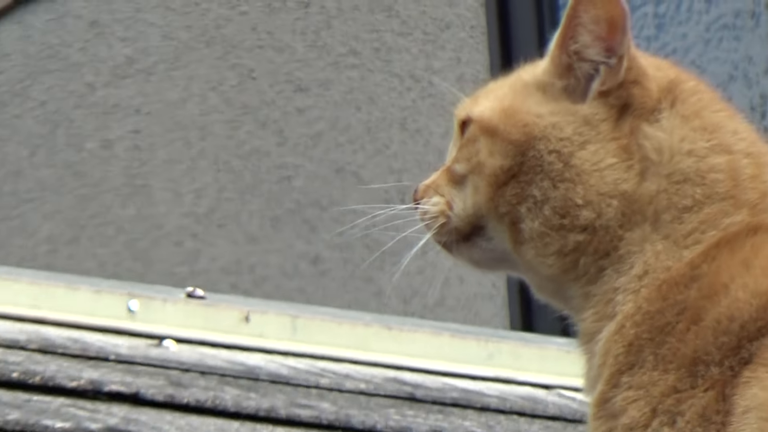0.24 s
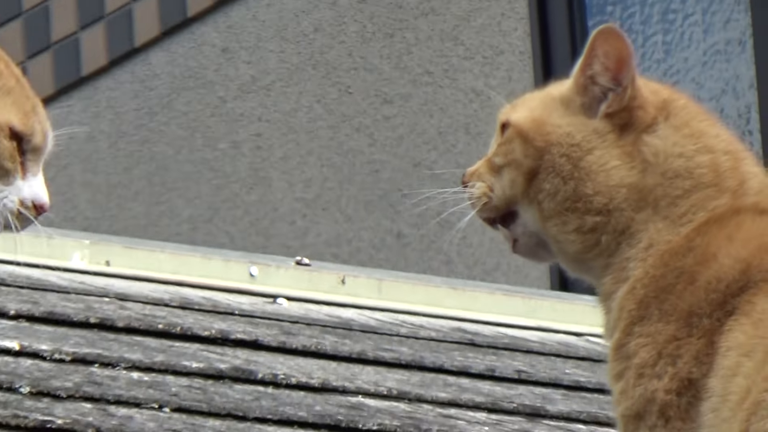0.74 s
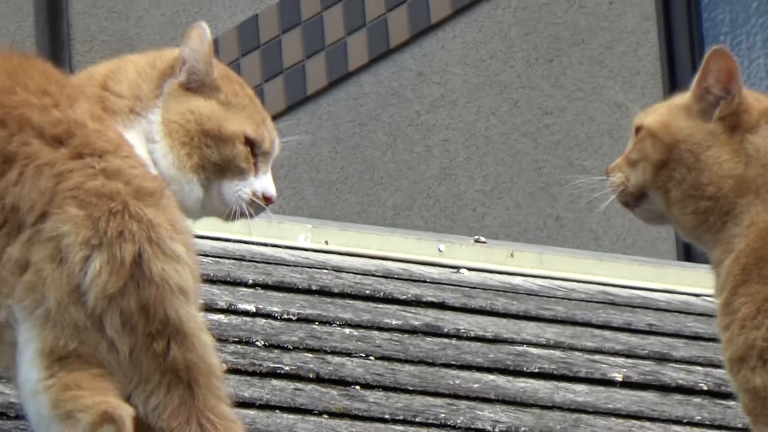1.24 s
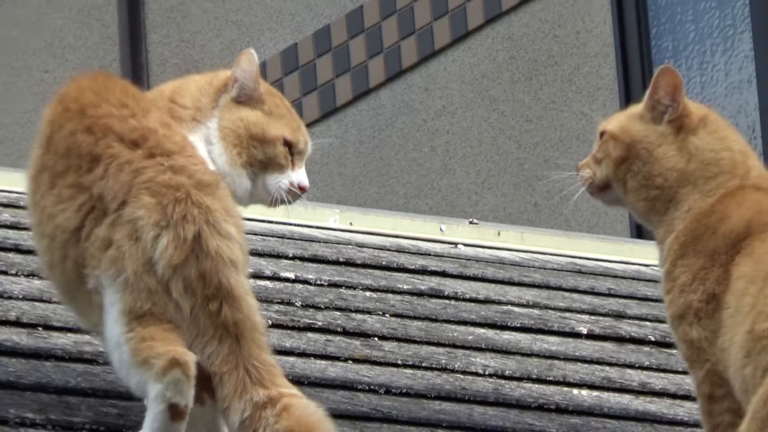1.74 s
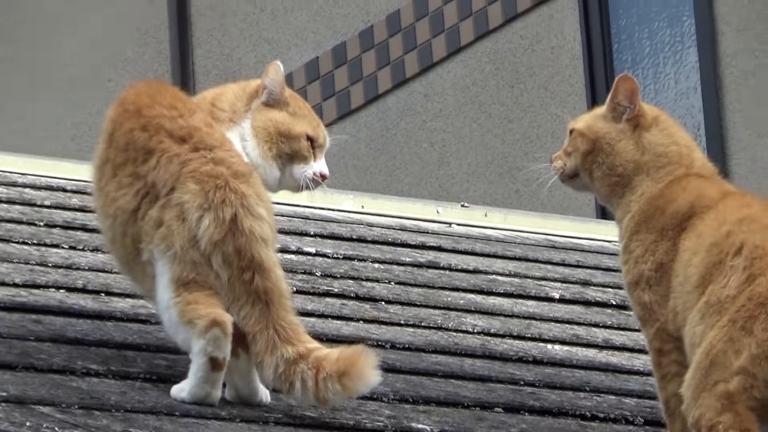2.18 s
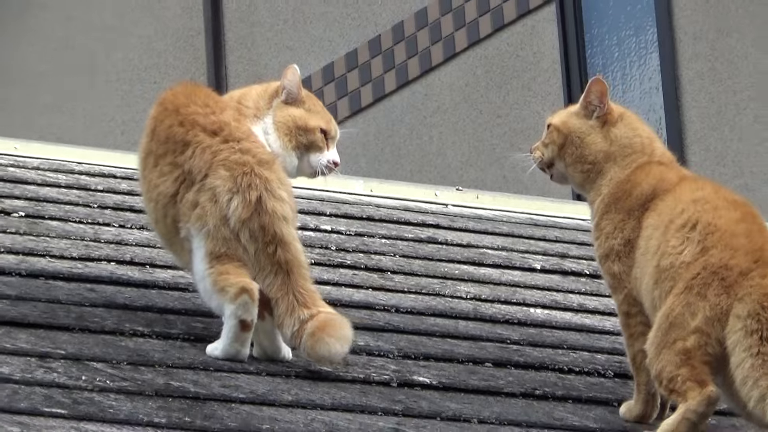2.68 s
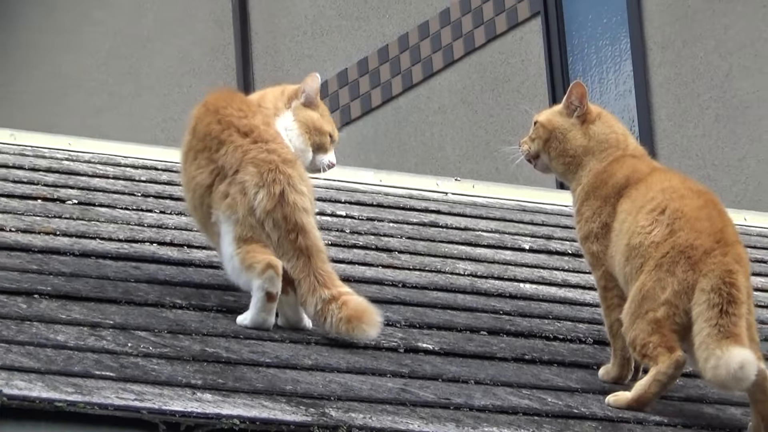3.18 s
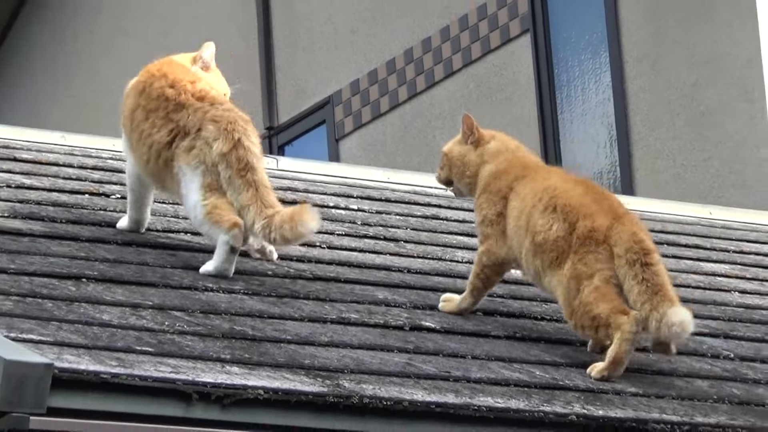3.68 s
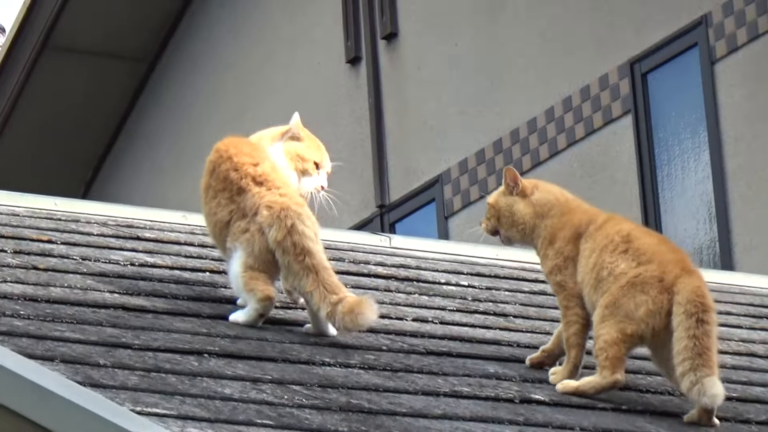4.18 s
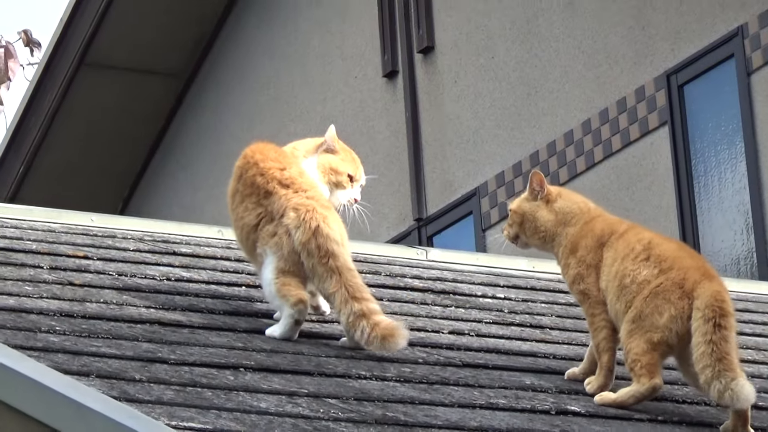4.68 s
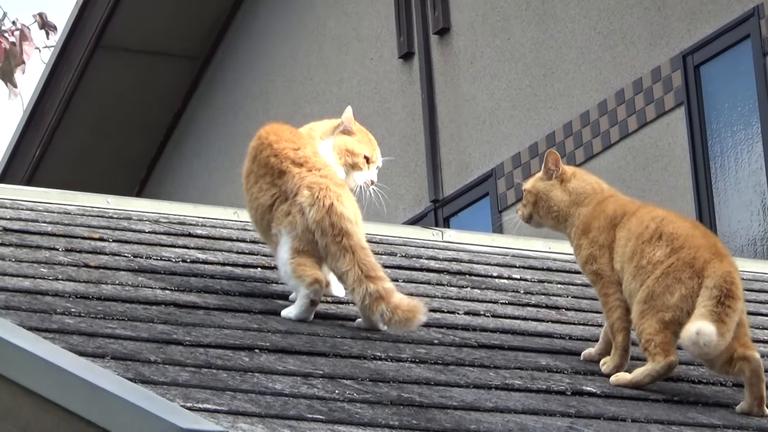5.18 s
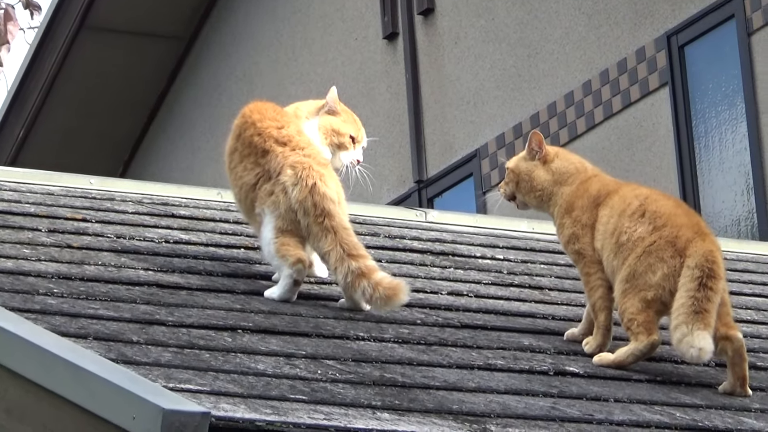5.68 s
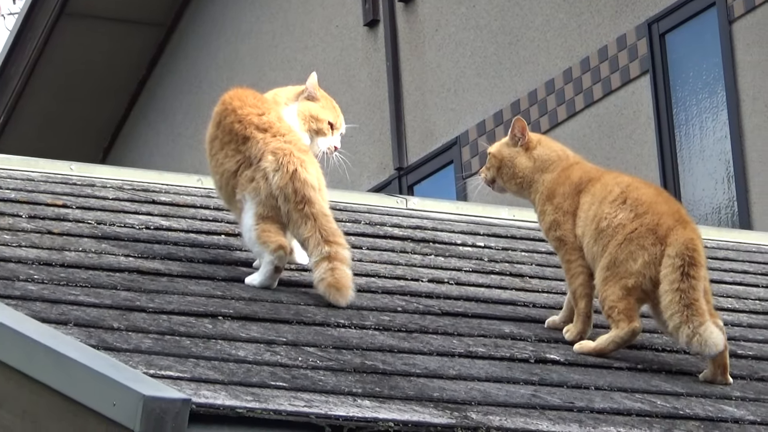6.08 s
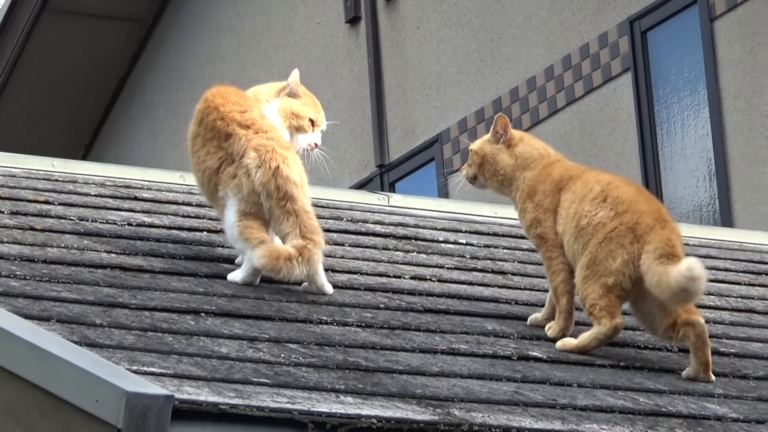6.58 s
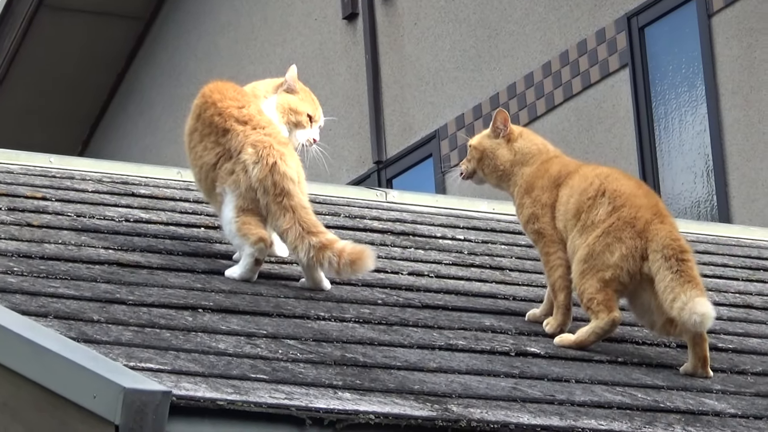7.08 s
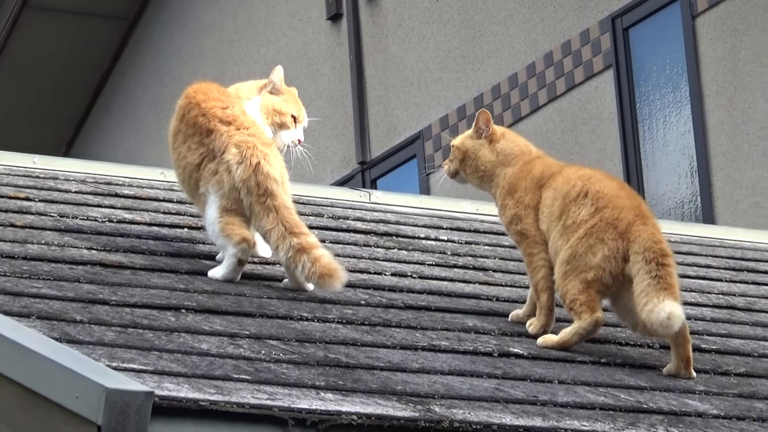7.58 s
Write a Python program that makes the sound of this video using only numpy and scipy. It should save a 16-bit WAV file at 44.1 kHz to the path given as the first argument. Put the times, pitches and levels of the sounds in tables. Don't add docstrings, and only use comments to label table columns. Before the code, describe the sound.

Outdoors on a tiled roof between houses, a paw knocks a loose tile, then a cat ahead yowls four times, each call rising slightly, holding and sagging, later ones louder. Walls return short echoes. A dog barks far to the right between and under the calls. Low town rumble and air hiss continue throughout, with a faint lens motor whine early on. Close stereo microphones.

```python
import sys
import numpy as np
from scipy import signal
from scipy.io import wavfile
from scipy.ndimage import uniform_filter1d

SR = 44100
rng = np.random.default_rng(int(sys.argv[2]) if len(sys.argv) > 2 else 0)


def ratio_of_db(decibels):
    return 10 ** (np.asarray(decibels, float) / 20)


def output_pcm(signal):
    pcm = np.clip(np.atleast_2d(signal).T, -1, 1) * 32767
    wavfile.write(sys.argv[1], SR, np.round(pcm).astype(np.int16))


N = 345744
T = np.arange(N) / SR

# [f/Hz, density/dB per Hz]
TOWN_SPECTRUM = [(25, -20), (65, -16.5), (154, -11.5), (800, -15.5), (1600, -22.5), (3620, -29.5),
                 (9050, -31.5), (12800, -40.5)]
# [f/Hz, likeness/0-1]
STEREO_LIKENESS = [(60, 0.99), (130, 1.0), (290, 0.95), (640, 0.81), (1410, 0.5), (3100, 0.42), (6820, 0.7),
                   (15000, 1)]
# [t/s, nearness/dB]
VEHICLE_NEARNESS = [(0, 1.5), (1, -0.5), (2.2, 2), (3.8, 1), (4.7, 4), (6, 3.5), (6.6, 4.5), (7.4, 6.5),
                    (7.84, 5)]
# [f/Hz, width/Hz, level/dB]
ENGINE_BANDS = [(173, 17, -2.5), (248.7, 48, -3.5), (114.4, 65, -5)]
ENGINE_DB, ENGINE_SHARE, AIR_SHARE = -63, 2.55, 0.05
# (peak t/s, level/dB, slope/dB per s)
FAR_MACHINE = (5.24, -56, 26)
ZOOM_END_S, WHINE_HZ, WHINE_DB, WHINE_FADE_DB_PER_S, STILL_AIR_DB = 3.34, 13750, -75, 1.5, 4
SETTLE_S, SETTLE_DB = 6.67, -1.5

# [start t/s, length/s, start f/Hz, end f/Hz, level/dB]
FAINT_TONES = [
    (1.45, .14, 570, 410, -53),
    (4.8, .14, 595, 560, -45),
    (2.35, .09, 1370, 1450, -57),
    (2.46, .1, 1440, 1400, -61),
    (1.99, .07, 1150, 1180, -62),
    (.075, .035, 3750, 3800, -67),
]

# [delay t/s, left level/dB, right level/dB]
WALL_ECHOES = [(.013, -13, -16), (.028, -22, -16), (.042, -15, -19), (.074, -26, -23)]
YARD_T60_S, YARD_DB, YARD_TOP_HZ = .5, -10.5, 3930

# [t/s, peak level/dB, body f/Hz, treble level/dB, scrape length/s]
LOOSE_STEPS = [
    (.123, -34.5, 4900, -4, 0.012),
    (0.132, -17.5, 1300, -18, .001),
]
FIRM_STEPS = [(0.139, -34, 1200, -3.5, 0.042), (2.253, -48, 3000, .5, .004), (2.305, -53, 3000, 4, 0.011),
              (3.287, -34.5, 1400, -30, 0.0048), (3.296, -44.5, 4420, 1, 0.019),
              (3.471, -43, 3020, -4, 0.0032), (3.533, -33, 3300, -29, 0.0044), (4.86, -44, 2400, -5, 0.03),
              (6.76, -41, 1500, -14, 0.015), (6.79, -56, 4000, 11, 0.022), (3.74, -44, 7500, -2, .04),
              (7.622, -56, 6000, 5, 0.022)]
# [f/Hz, width/Hz, level/dB]
TILE_MODES = [(1290, 38, 2.5), (1980, 110, 1), (3360, 61, -7), (4980, 41, -6.5), (6060, 82, -14),
              (7500, 34, -14), (8500, 81, -10)]
FIRM_RING_DB, LOOSE_RING_DB = -23, -2

# [t/s, pitch f/Hz, effort level/dB, mouth opening level/dB, tongue/0 back - 1 front]
YOWL_1 = [(.647, 571, -40.5, -7, 0.13), (0.674, 619, -33.5, -12, 0.069), (0.735, 656, -29, -5, 0.4),
          (0.83, 676, -27, -3.5, 0.61), (1.012, 687, -28.5, 3, 0.56), (1.185, 680.7, -30.5, -1, 0.58),
          (1.28, 630.6, -25.5, -15.5, .32), (1.329, 619, -35, -15, 0.29), (1.41, 598, -45.5, -9, 0.19)]
YOWL_2 = [(2.773, 668, -36, -17, .15), (2.794, 676.2, -33.5, -12, 0.36), (2.865, 698.5, -34, -6, .42),
          (2.903, 697.7, -32, -11.5, 0.48), (3.011, 690.7, -31, -6.5, 0.48),
          (3.179, 680.4, -27, -7.5, 0.57), (3.263, 642, -31, -8.5, 0.46), (3.3, 649.6, -57, -1, .6),
          (3.325, 633, -42, -7, 0.61)]
YOWL_3 = [(3.684, 791.7, -50.5, 16, 0.026), (3.725, 792, -32, 10.5, 0.021), (3.862, 796.8, -28.5, 5, 0.54),
          (4.012, 782.8, -25.5, 4, 0.57), (4.186, 768.4, -25.5, -2.5, 0.72),
          (4.226, 762.6, -22.5, 2.5, 0.55), (4.452, 706, -23.5, 0, 0.66), (4.63, 688.8, -20.5, -6.5, .55),
          (4.791, 677.5, -22, -9, 0.27)]
YOWL_4 = [(5.669, 586.5, -27.5, -1.5, -0.22), (5.717, 632.3, -22, -9, -0.017),
          (5.825, 656.4, -22.5, -6.5, 0.26), (5.972, 648.4, -17, -11, 0.37),
          (6.021, 638.4, -19.5, -15, 0.55), (6.042, 668, -22.5, -17, .8)]
YOWL_4_END = [(6.062, 681.7, -30.5, -12.5, 0.85), (6.229, 671.6, -25.5, -20.5, 0.68),
              (6.433, 648, -23, -21, .35), (6.517, 633.4, -25, -15.5, 0.47), (6.569, 612, -21.5, -18, 0.26),
              (6.637, 587.2, -23.5, -10.5, 0.32), (6.732, 602.4, -32, -29, .02), (6.77, 549, -51, -6, .3)]
# [f/Hz, width/Hz, level/dB]
MOUTH_RESONANCES = [
    [(4090, 540, 2.5), (5300, 640, -11), (6200, 190, -11), (8680, 400, -3.5), (9980, 220, -13),
     (12100, 500, -17)],
    [(3940, 1500, 3), (5360, 500, -9), (8030, 260, 1), (9270, 450, -1.5), (11500, 500, -18)],
    [(2880, 490, -8), (4500, 300, 4), (6000, 1300, -4), (7700, 1400, -8), (9170, 430, -8),
     (10800, 580, -10.5), (12300, 400, -16)],
    [(3580, 730, 5.5), (5000, 600, -12), (7280, 940, 2), (8600, 1000, -2), (11300, 600, -6)],
    [(4393, 163, 5.5), (5600, 760, -9), (7160, 490, -6), (8630, 320, -9), (10500, 800, -19.5)],
]
# [start level/dB, middle level/dB, end level/dB, share of the effort swell]
FUNDAMENTALS = [(-37.5, -43.5, -38, 0.99), (-37.5, -43, -42, 0.54), (-31, -29.5, -40, 0.55),
                (-44.5, -33.5, -47.5, 0.13), (-39, -37.5, -49, 0.083)]
# [level under effort/dB, loss/dB per octave under top pitch, release/s, breath level/dB]
TREBLES = [(-16.5, 63, 0.024, -36), (-20, 33, 0.009, -32), (-17, 26.5, 0.074, -33), (-25.5, 36, 0.045, -46),
           (-24, 10, 0.0096, -35.5)]
# [start depth f/Hz, start time/s, end depth f/Hz, end time/s]
PITCH_SCOOPS = [(0, .05, 0, .05), (0, .05, 0, .05), (440, .066, 92, .065), (0, .05, 0, .05),
                (0, .05, 0, .05)]
# [peak t/s, level/dB, time to lose 15 dB/s]
ROUGH_SPELLS = [(4.04, -49.5, .3), (4.8, -58, 0.3)]
ATTACK_S, EDGE_DB, OPEN_SHARE, HISS_DB = .012, -26, 0.29, -20
TONGUE_BACK_HZ, TONGUE_SPAN_HZ, TONGUE_WIDTH_HZ = 1804, 1200, 296

# [peak t/s, level/dB, rise/s, fall/dB per s]
BARK_THROBS = [
    [(2.118, -32, .025, 60), (2.168, -27.5, 0.075, 87)],
    [(7.196, -21.5, 0.069, 200), (7.224, -20, .03, 700), (7.284, -29.5, 0.071, 117)],
    [(7.465, -35, .015, 45), (7.526, -24.5, 0.031, 92), (7.63, -29, .02, 170), (7.786, -43, .02, 250)],
    [(3.729, -21.5, 0.046, 129)],
]
# [throat f/Hz, start f/Hz, clean attack/s, smear width/Hz]
BARK_THROATS = [(883, 930, 0.069, 280), (886, 800, 0.11, 280), (832, 780, 0.016, 178),
                (879.7, 860, 0.082, 180)]
# [rasp low f/Hz, rasp high f/Hz, rasp level/dB, skirt level/dB]
BARK_RASPS = [(1480, 2260, -56, -50.5), (1620, 2400, -52, -44.5), (1487, 2070, -50.5, -55.5),
              (1500, 2300, -54, -42)]
RISE_DB, SKIRT_SHARE, RASP_SHARE = -26.5, 0.57, 0.69

TOP_HZ = 15750


def curves(table):
    s, *columns = np.transpose(table)
    gate = np.clip(np.minimum(T - s[0], s[-1] - T) / 0.0051, 0, 1)
    return [np.interp(T, s, c) for c in columns], gate


def colour(table, hz):
    points_hz, values = np.transpose(table)
    return np.interp(np.log(hz), np.log(points_hz), values)


def band(x, lo_hz, hi_hz):
    edges = [lo_hz, min(hi_hz, .45 * SR)]
    return signal.sosfilt(signal.butter(2, edges, "bandpass", fs=SR, output="sos"), x)


def unit(x):
    return x / np.sqrt(np.mean(x ** 2))


def steep(x, lo_hz, hi_hz):
    return unit(band(band(x, lo_hz, hi_hz), lo_hz, hi_hz))


def walk(rate, size=N):
    k = int(SR / rate)
    held = np.repeat(rng.standard_normal(size // k + 1), k)
    return unit(uniform_filter1d(uniform_filter1d(held, k), k)[:size])


def town(level_db=-53, flicker_db=1.84):
    (traffic_db,), _ = curves(VEHICLE_NEARNESS)
    still = np.clip((T - ZOOM_END_S) / 0.69, 0, 1)
    settled = np.clip((T - SETTLE_S) / 0.33, 0, 1)
    air_db = -0.8 + STILL_AIR_DB * still + SETTLE_DB * settled + AIR_SHARE * traffic_db
    out = 0
    for hz in 25 * 2 ** np.arange(0, 9.4, .5):
        mid, side = (unit(band(rng.standard_normal(N), hz / 1.223, hz * 1.2)) for _ in range(2))
        like = np.clip(colour(STEREO_LIKENESS, hz), 0, 1)
        bass = 1 / (1 + (hz / 420) ** 2)
        db = colour(TOWN_SPECTRUM, hz) + 10 * np.log10(hz / 170)
        db = db + bass * traffic_db + (1 - bass) * air_db + flicker_db * (0.6 + bass) * walk(8.5)
        spread = np.sqrt((1 - like) / (1 + like)) * side * np.array([[1], [-1]])
        out = out + ratio_of_db(db) * (mid + spread)
    drone = sum(ratio_of_db(db) * unit(band(rng.standard_normal(N), f - w / 2, f + w / 2))
                for f, w, db in ENGINE_BANDS)
    drone = ratio_of_db(ENGINE_DB + ENGINE_SHARE * traffic_db) * drone
    peak_s, peak_db, slope = FAR_MACHINE
    far_db = peak_db - slope * np.abs(T - peak_s) + 2.3 * walk(23)
    far = ratio_of_db(far_db) * steep(rng.standard_normal(N), 950, 1600)
    whine_db = WHINE_DB - WHINE_FADE_DB_PER_S * T + 3.5 * walk(60)
    motor_on = np.clip((ZOOM_END_S - T) / .1, 0, 1)
    whine = ratio_of_db(whine_db) * motor_on * np.sin(2 * np.pi * WHINE_HZ * T)
    return ratio_of_db(level_db) * out + drone + far + whine


def mew(s, length, start_hz, end_hz, db):
    age = np.linspace(0, 1, int(length * SR))
    tone = np.sin(2 * np.pi * np.cumsum(start_hz + (end_hz - start_hz) * age) / SR)
    level = np.sin(np.pi * age) * ratio_of_db(db + 2.0 * walk(38.0, size=len(age)))
    out = np.zeros(N)
    out[int(s * SR):][:len(age)] = np.sqrt(2) * level * tone
    return out


def yard(x):
    t = T[:SR]
    decay = np.exp(-np.log(1000) * t / YARD_T60_S) * np.clip(t / 0.054, 0, 1)
    tail = rng.standard_normal((2, SR)) * decay
    tail = ratio_of_db(YARD_DB) * tail / np.sqrt(np.sum(tail ** 2, axis=1, keepdims=True))
    response = signal.sosfilt(signal.butter(1, YARD_TOP_HZ, fs=SR, output="sos"), tail)
    response[:, 0] = 1
    for s, left_db, right_db in WALL_ECHOES:
        response[0, int(s * SR)] += ratio_of_db(left_db)
        response[1, int(s * SR)] += ratio_of_db(right_db)
    return signal.fftconvolve(x[None], response)[:, :N]


def steps(table, ring_db):
    out, t = np.zeros(N + SR), T[:SR // 4]
    for s, db, hz, treble_db, scrape in table:
        push = rng.standard_normal(len(t)) * np.exp(-t / scrape) * np.clip(3 * t / scrape, 0, 1)
        body = band(push, .5 * hz, 1.34 * hz)
        tick = band(band(push, 2000, 10500), 1700, 12000)
        ring = sum(ratio_of_db(g_db) * band(push, f - 2 * w, f + 2 * w) / np.sqrt(w) for f, w, g_db in TILE_MODES)
        body, tick, ring = (part / np.abs(part).max() for part in (body, tick, ring))
        contact = body + ratio_of_db(treble_db) * tick + ratio_of_db(ring_db) * ring
        out[int(s * SR):int(s * SR) + len(t)] += ratio_of_db(db) * contact
    return out[:N]


def yowl(table, mouth, chest, bright, scoop, jitter=0.0021, shimmer_db=3.0):
    under_db, sag_db, release_s, breath_db = bright
    start_s, end_s = table[0][0], table[-1][0]
    edge = np.array([0, 0, EDGE_DB, 0, 0])
    onset = table[0] + edge - [ATTACK_S, 0, 0, 0, 0]
    release = table[-1] + edge + [release_s, 0, 0, 0, 0]
    columns, gate = curves([onset, *table, release])
    on = slice(*np.flatnonzero(gate)[[0, -1]])
    hz, second_db, open_db, tongue = (c[on] for c in columns)
    t, size = T[on], len(hz)

    hz = uniform_filter1d(hz, size=SR // 40, mode="nearest")
    hz = hz - scoop[0] * np.exp(-(t - onset[0]) / scoop[1])
    hz = hz - scoop[2] * np.exp(np.minimum(t - end_s, 0) / scoop[3])
    phase = 2 * np.pi * np.cumsum(hz * (1 + jitter * walk(59.6, size=size))) / SR

    first_db = np.interp(np.linspace(0, 2, size), range(3), chest[:3])
    first_db = first_db + chest[3] * (second_db - second_db.max())

    def off(k):
        return (k * hz - TONGUE_BACK_HZ - TONGUE_SPAN_HZ * tongue) / TONGUE_WIDTH_HZ

    upper = [second_db + open_db - 20 * np.log10(1 + off(k) ** 2) for k in (3, 4)]
    upper.append(second_db + open_db - 1 - 36 * np.log10(1 + off(5) ** 2))
    treble_db = second_db + under_db + OPEN_SHARE * open_db + sag_db * np.log2(hz / hz.max())

    from_edge = np.minimum(release[0] - t, 3 * (t - onset[0]))
    fray = .05 + .7 * np.clip(1 - from_edge / .1, 0, 1)
    low = 0
    for k, db in enumerate([first_db, second_db, *upper]):
        level = ratio_of_db(db + .8 * walk(17.87, size=size)) * (1 + fray * walk(160, size=size))
        low = low + level * np.cos((k + 1) * phase)

    stack = np.arange(5, 22)[:, None] * hz
    gains = np.sqrt(sum(ratio_of_db(2 * db) / (1 + ((stack - f) / w) ** 2) ** 2 for f, w, db in mouth))
    gains /= np.sqrt(np.sum(gains ** 2 * np.clip((stack - 3000) / 400, 0, 1), axis=0))
    top = sum(g * ratio_of_db(shimmer_db * walk(25.38, size=size)) * np.sin((k + 5) * phase + k * k)
              for k, g in enumerate(gains))

    halves = sum(ratio_of_db(db) * walk(200, size=size) * np.sin((k + 1.5) * phase)
                 for k, db in enumerate([-9, 0, -4, -9, -14]))
    halves_db = np.max([db - 15 * ((t - s) / width) ** 2 for s, db, width in ROUGH_SPELLS], axis=0)
    breath = steep(rng.standard_normal(size), 770, 3730)
    breath = ratio_of_db(second_db + breath_db) * (1 + 1.8 * fray) * breath
    top = top + ratio_of_db(HISS_DB) * (1 + 2.6 * fray) * steep(rng.standard_normal(size), 3100, 9800)
    out = np.zeros(N)
    out[on] = np.sqrt(2) * (low + ratio_of_db(treble_db) * top + ratio_of_db(halves_db) * halves) + breath
    return out * gate


def bark(throbs, throat, rasp):
    hz, start_hz, clean_s, width_hz = throat
    lo_hz, hi_hz, rasp_db, skirt_db = rasp
    first = int((throbs[0][0] - 1.5 * throbs[0][2]) * SR)
    t = T[first:first + SR // 2]
    age, size = t - t[0], len(t)
    db = np.max([peak_db + np.where(t < s, RISE_DB * ((s - t) / rise) ** 1.56, fall * (s - t))
                 for s, peak_db, rise, fall in throbs], axis=0)
    under_peak_db = db - db.max()
    hoarse = np.clip(.07 + (age - clean_s) / .06, .07, .38)
    pitch = hz + (start_hz - hz) * np.exp(-(age / 0.0473) ** 2)
    pitch = pitch * (1 + 0.007 * walk(31.3, size=size))
    tone = np.sqrt(2) * np.sin(2 * np.pi * np.cumsum(pitch) / SR)
    smear = steep(rng.standard_normal(size), hz - width_hz / 2, hz + width_hz / 2)
    skirt_db = skirt_db + SKIRT_SHARE * under_peak_db + 1.3 * walk(40, size=size)
    skirt = ratio_of_db(skirt_db) * steep(rng.standard_normal(size), 950, 1470)
    rasp_db = rasp_db + RASP_SHARE * under_peak_db + 2.3 * walk(31.5, size=size)
    rough = ratio_of_db(rasp_db) * steep(rng.standard_normal(size), lo_hz, hi_hz)
    voice = ratio_of_db(db) * (np.sqrt(1 - hoarse) * tone + np.sqrt(hoarse) * smear)
    fade = np.clip(np.minimum(age / .02, (.5 - age) / .1), 0, 1)
    out = np.zeros(N)
    out[first:first + size] = fade * (voice + skirt + rough)
    return out


def scene():
    notes = [YOWL_1, YOWL_2, YOWL_3, YOWL_4, YOWL_4_END]
    voices = zip(notes, MOUTH_RESONANCES, FUNDAMENTALS, TREBLES, PITCH_SCOOPS)
    cat = sum(mew(*m) for m in FAINT_TONES) + sum(yowl(*v) for v in voices)
    paws = steps(LOOSE_STEPS, LOOSE_RING_DB) + steps(FIRM_STEPS, FIRM_RING_DB)
    dog = sum(bark(*b) for b in zip(BARK_THROBS, BARK_THROATS, BARK_RASPS))
    dog_pan_db = 2.5
    dog = dog * ratio_of_db([[-dog_pan_db], [dog_pan_db - .6]])
    return town() + yard(ratio_of_db(-0.5) * cat + paws) + dog


def roll_off(x):
    return signal.sosfilt(signal.butter(12, 16080, fs=SR, output="sos"), x)


def record(dry):
    mix = signal.sosfilt(signal.ellip(8, .2, 70, TOP_HZ, fs=SR, output="sos"), dry)
    return roll_off(mix)


dry = scene()
out = record(dry)
output_pcm(out)
```